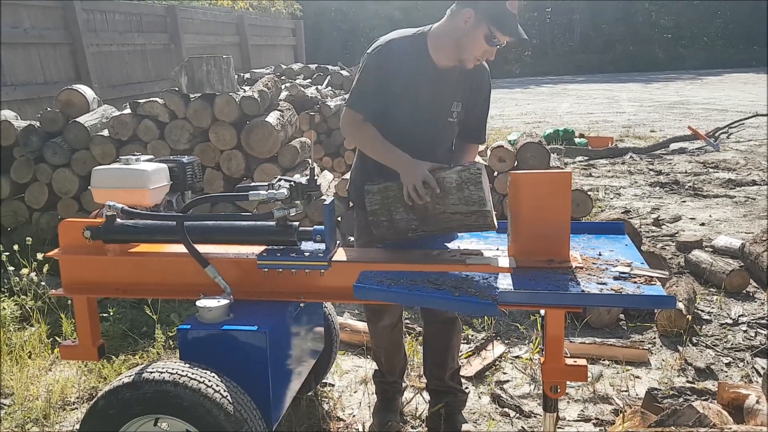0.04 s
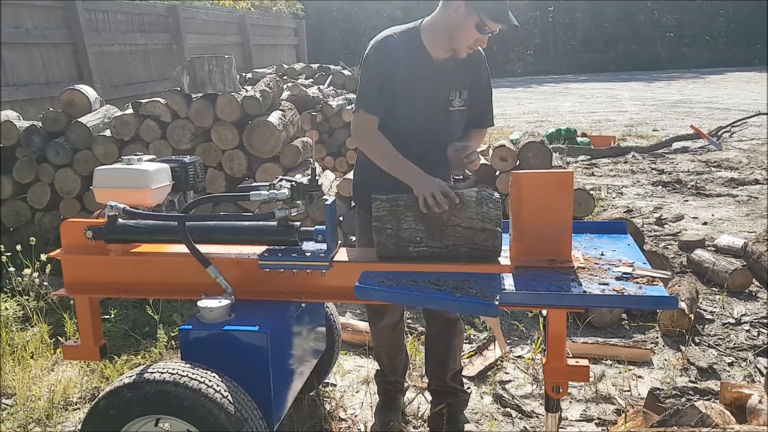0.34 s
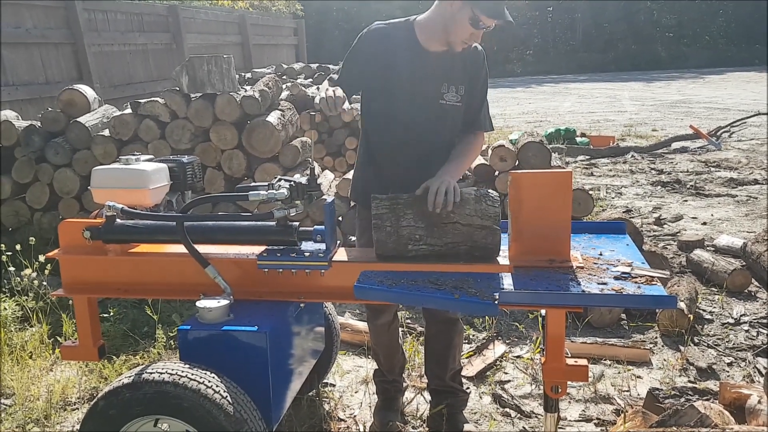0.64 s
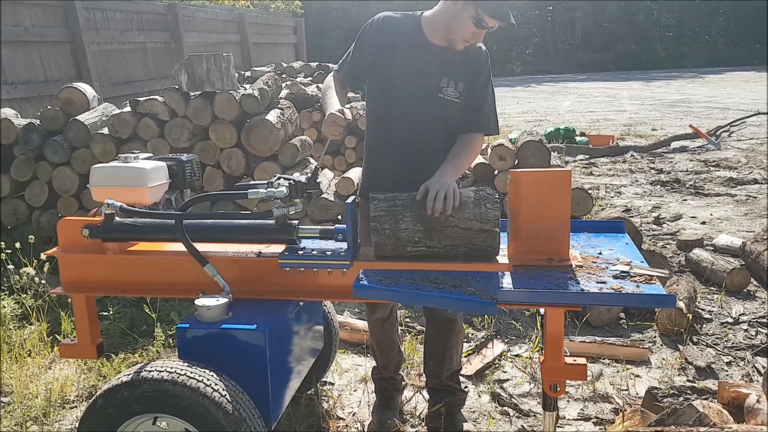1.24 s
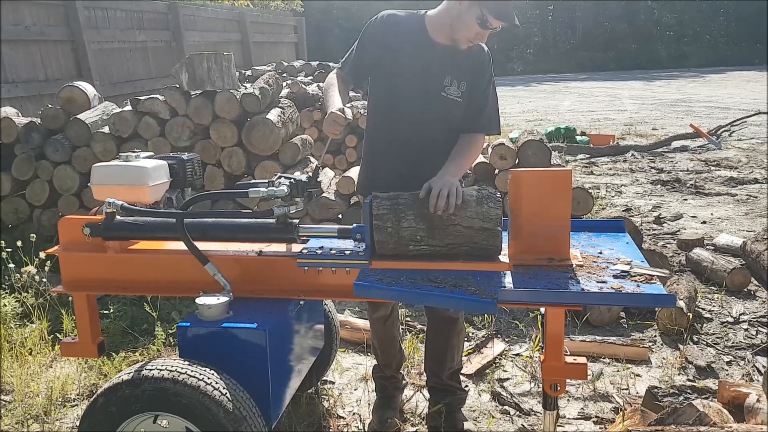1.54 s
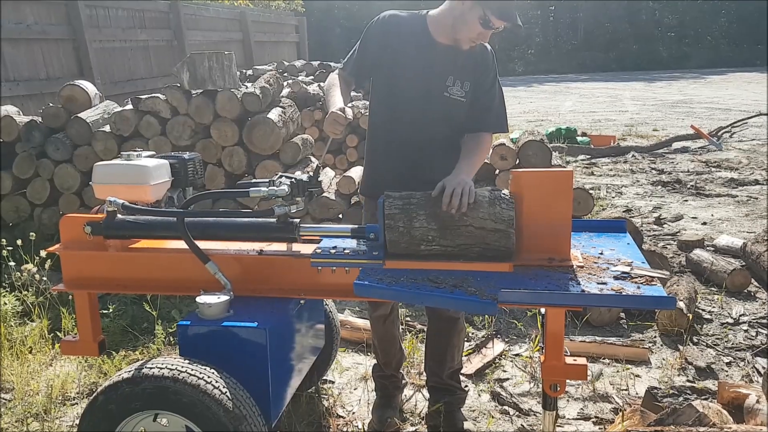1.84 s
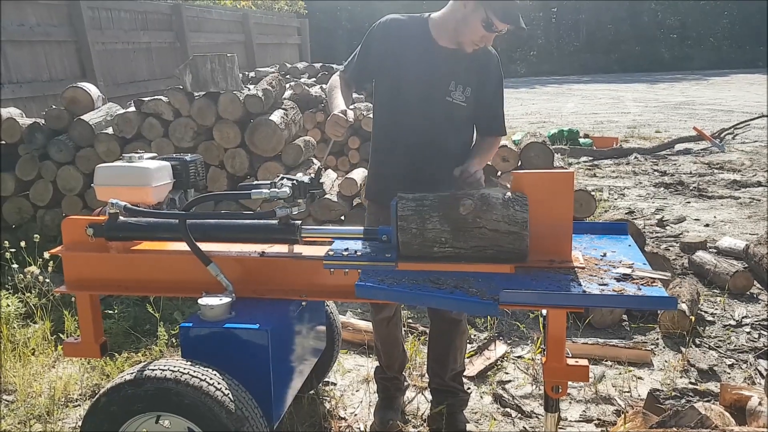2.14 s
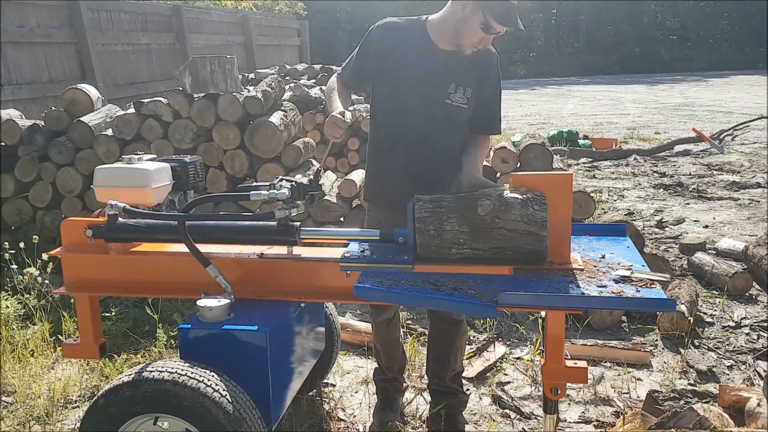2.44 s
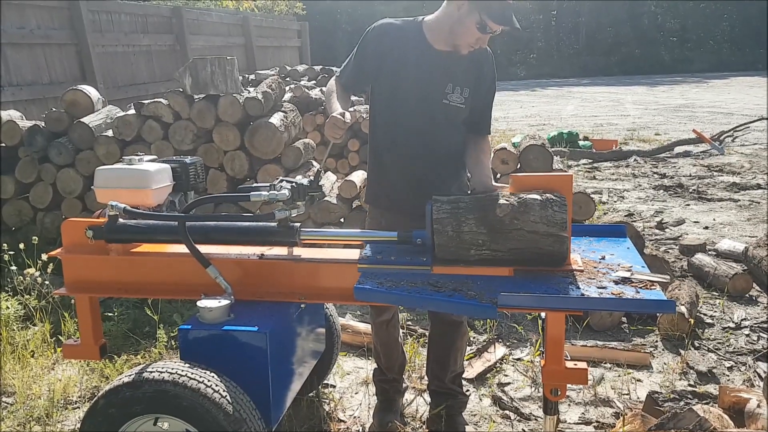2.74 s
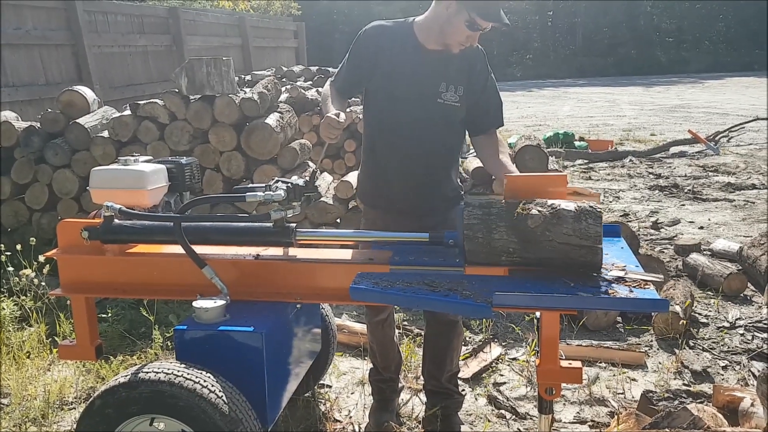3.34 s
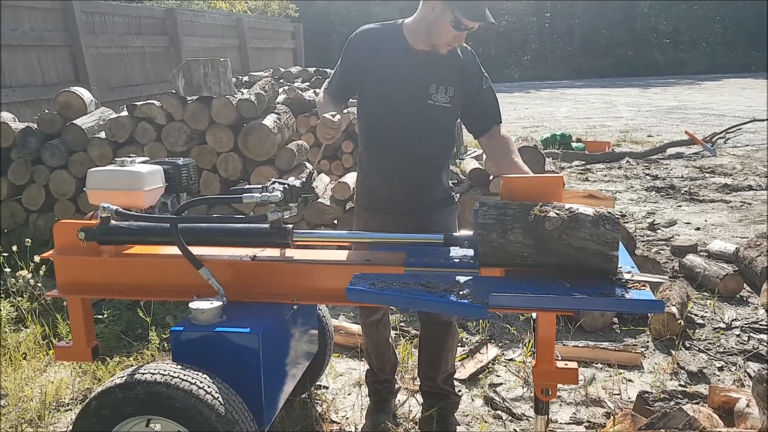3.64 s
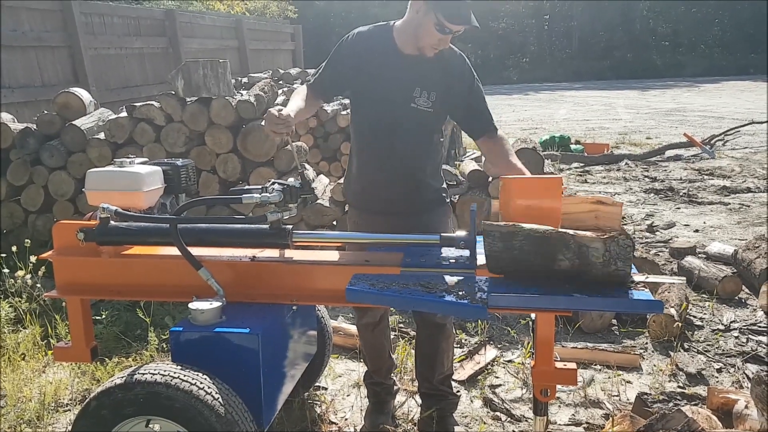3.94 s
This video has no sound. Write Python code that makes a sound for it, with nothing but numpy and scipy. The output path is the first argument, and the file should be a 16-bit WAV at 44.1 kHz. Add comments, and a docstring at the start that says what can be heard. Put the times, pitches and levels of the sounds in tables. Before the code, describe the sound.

Log splitter engine running steadily while wood scrapes, groans and cracks apart against the wedge.

```python
"""A single-cylinder petrol engine drones outdoors, driving a hydraulic log splitter.
The log scrapes and bumps on the steel beam, with one crack at 1 s. Near 2 s the ram presses it onto
the wedge: the engine sags, the wood groans, fibres tear and the log cracks open.
After the loudest crack the whole sound sinks for over half a second, then returns as the log
slides on with a few small cracks."""
import sys
import numpy as np
from scipy import signal
from scipy.fft import rfft, irfft
from scipy.io import wavfile

SR = 44100
rng = np.random.default_rng(int(sys.argv[2]) if len(sys.argv) > 2 else 0)


def unload_wav(signal):
    """Save mono or channel-first audio to the path in sys.argv[1] as 16-bit WAV at rate SR, clipped to [-1, 1]."""
    wavfile.write(
        sys.argv[1],
        SR,
        np.round(np.clip(np.atleast_2d(signal).T, -1, 1) * 32767).astype(np.int16),
    )


N = 176400
TIME = np.arange(N) / SR

# Engine speed. Each row: time in seconds, firings per second.
FIRING_HZ = [(0.0, 31.48), (0.08, 31.52), (0.23, 32.76), (0.45, 31.84), (0.62, 32.35), (0.8, 32.3),
             (1.2, 31.71), (1.47, 31.79), (1.6, 31.98), (1.86, 31.88), (2.1, 30.39), (2.3, 31.79),
             (2.48, 32.05), (2.75, 31.72), (3.2, 31.9), (3.7, 31.9), (4.0, 31.59)]


def amp(db):
    """Decibels to gain."""
    return 10 ** (np.asarray(db) / 20)


def unit(x):
    """Scale to rms 1."""
    return x / np.sqrt(np.mean(x ** 2) + 1e-20)


def curve(rows):
    """Time table interpolated at every sample."""
    return np.interp(TIME, *np.transpose(rows))


def at_hz(rows, hz):
    """Frequency table interpolated on a log axis."""
    row_hz, value = np.transpose(rows)
    return np.interp(np.log(hz + 1), np.log(row_hz + 1), value)


def add(mix, start_s, sound):
    """Mix a sound in at start_s."""
    part = mix[max(round(start_s * SR), 0):][:len(sound)]
    part += sound[:len(part)]


def drift(hz):
    """Random wander up to about hz, rms 1."""
    rolloff = 1 + (np.fft.rfftfreq(N, 1 / SR) / hz) ** 4
    return unit(irfft(rfft(rng.standard_normal(N)) / rolloff, N))


def through(x, response):
    """Convolve with a mono or stereo response."""
    return signal.fftconvolve(np.atleast_2d(x), np.atleast_2d(response), axes=1)[:, :N]


def colour(spectrum, size=4096):
    """Minimum-phase response with the given spectral shape, energy 1."""
    log_gain = np.log(amp(at_hz(spectrum, abs(np.fft.fftfreq(size, 1 / SR)))))
    response = np.fft.ifft(np.exp(np.conj(signal.hilbert(log_gain)))).real[:size // 2]
    return response / np.linalg.norm(response)


def ring(modes, size=8000):
    """Decaying sines of a struck body, energy 1."""
    t = np.arange(size) / SR
    response = sum(amp(db - 60 * t / t60_s) * np.sin(2 * np.pi * hz * t) for hz, db, t60_s in modes)
    return response / np.linalg.norm(response)


def stereo_noise(size):
    """White noise pair, alike in the bass."""
    # Each row: frequency in Hz, left-right correlation from 0 to 1.
    likeness = [(30, 0.7), (110, 0.6), (270, 0.82), (700, 1), (1200, 0.2), (2000, 0.26), (4000, 0.25),
                (16000, 0)]
    left, other = rfft(rng.standard_normal((2, size)))
    same = np.clip(at_hz(likeness, np.fft.rfftfreq(size, 1 / SR)), 0, 1)
    right = same * left + np.sqrt(1 - same ** 2) * other
    return irfft(np.array([left, right]), size)


def scatter(t60_s, size=8000):
    """Dense stereo reflections, energy 1 a side."""
    response = stereo_noise(size) * amp(-60 * np.arange(size) / SR / t60_s)
    return response / np.linalg.norm(response, axis=1, keepdims=True)


def rush(cycles):
    """Exhaust gas and cooling fan noise, throbbing with each engine cycle."""
    # Each row: frequency in Hz, relative density in dB.
    spectrum = [(15, -23), (30, -7.5), (50, -12), (110, -8), (210, -11), (320, -5), (460, -12), (700, -7.5),
                (900, -12.5), (1130, -4), (1400, -10), (1800, -10.5), (2400, -15.5), (2750, -17.5),
                (3300, -23), (5000, -26.5), (6300, -35), (8000, -33), (10100, -38), (12800, -32),
                (15800, -41)]
    # Each row: time in seconds, gain in dB.
    gain_db = [(0, 8.5), (.15, 5), (.9, 5), (1.03, 6), (1.15, 4.5), (1.9, 5), (2.6, 4), (3.5, 2), (4, 4)]
    air = unit(through(stereo_noise(N), colour(spectrum)))
    throb = 1 + 0.091 * np.cos(2 * np.pi * (cycles - 0.58)) + 0.15 * np.cos(4 * np.pi * (cycles - 0.43))
    flutter_db = 0.7 * drift(hz=24.6)
    return air * unit(throb) * amp(-19 + curve(gain_db) + flutter_db)


def engine_order(cycles, k, db, waver, phase_rad):
    """Harmonic k of the firing rate: swells near a panel resonance, thins near the boom under load."""
    # Panel resonances. Each row: centre in Hz, half-width in Hz, boost in dB.
    panels = [(293, 5, 6.5), (357, 4, 3.5), (1034, 6, 9.5), (615, 5, 5.5)]
    # Each row: time in seconds, engine load from 0 to 1.
    load = [(1.85, 0), (2.03, 0.3), (2.2, 1), (2.35, 0.5), (2.5, 0.07)]
    boom_hz, boom_width_hz, full_load_db = 124, 16, -16
    hz = k * curve(FIRING_HZ)
    panel_db = sum(boost / (1 + ((hz - centre) / width) ** 2) for centre, width, boost in panels)
    load_db = full_load_db * curve(load) / (1 + ((hz - boom_hz) / boom_width_hz) ** 2)
    angle = 2 * np.pi * k * cycles + phase_rad
    tone = (1 + waver * drift(hz=6)) * np.cos(angle) + waver * drift(hz=6) * np.sin(angle)
    return amp(db + panel_db + load_db) * tone


def whine(cycles):
    """High, restless orders of the gears and fan."""
    # Each row: multiple of the firing rate, relative level in dB.
    orders = [(19, -13), (21, -10), (23, -6), (24, -5), (27, -12), (31, -8), (32, -4), (33, -6), (34, -4),
              (35, -3), (36, -1), (37, -7), (38, -8), (40, -6), (41, -10), (48, -6), (54, -12), (55, -9),
              (62, -13), (85, -18)]
    return sum(engine_order(cycles, k, db - 25.5, waver=0.22, phase_rad=2 * np.pi * rng.random())
               for k, db in orders)


def exhaust(cycles):
    """Low orders crest once a firing, slightly smeared by the muffler; weak ones waver most."""
    # Each row: multiple of the firing rate, relative level in dB.
    orders = [(1, -59), (2, -0.5), (3, -8), (4, 2.5), (5, -10), (6, -6), (7, -24.5), (8, -1), (9, -13.5),
              (10, -10), (11, -9), (12, -13), (13, -24.5)]
    lead_rad, smear_rad = 0.25, 0.014
    return sum(engine_order(cycles, k, db - 18, waver=0.097 * amp(-db / 2),
                            phase_rad=lead_rad - smear_rad * k * k) for k, db in orders)


def clatter(cycles):
    """Piston and valves knock at set points of the cycle, ringing the casing and rattling the frame."""
    # Each row: position as a fraction of the cycle, relative level in dB.
    knock_points = [(.02, -2), (0.189, -5), (0.431, -9.5), (.59, 1), (.79, -10.5)]
    # Crankcase and covers. Each row: frequency in Hz, relative level in dB, T60 in seconds.
    casing_modes = [(614, -20, 0.084), (781, -24, 0.15), (1040, 6.5, 0.18), (1191, -35.5, 0.02),
                    (1323, -19.5, 0.12), (1487, 1, 0.24), (1755, -11, 0.21), (2160, -2, 0.12),
                    (2620, -22, 0.18)]
    # Each row: frequency in Hz, relative density in dB.
    rattle_spectrum = [(20, -52), (150, -20), (330, -8.5), (470, -15), (720, -12), (900, 1), (1120, -5),
                       (1400, -8), (1900, -4.5), (2400, -11.5), (2800, -8.5), (3500, -21.5), (6000, -29),
                       (16000, -34)]
    jitter_s, spread_db = 0.00005, 1.4
    knocks, cycle_index = np.zeros(N), np.arange(int(cycles[-1]) + 1)
    for fraction, db in knock_points:
        late, force = rng.standard_normal((len(cycle_index), 2)).T
        due_s = np.interp(cycle_index + fraction, cycles, TIME, left=-1, right=-1)
        at = np.round((due_s + jitter_s * late) * SR).astype(int)
        heard = (at >= 0) & (at < N)
        knocks[at[heard]] += amp(db + spread_db * force[heard])
    casing = through(knocks, ring(casing_modes))
    casing = unit(casing + 0.48 * through(casing, scatter(t60_s=0.1)))
    rattle = through(knocks, colour(rattle_spectrum))
    rattle = unit(through(rattle, scatter(t60_s=0.025)))
    return amp(-30) * casing + amp(-28) * rattle


def log_knocks():
    """Short damped knocks: the log bumps on the beam, and rings woodily at the loudest crack."""
    # Each row: start in seconds, level in dB, frequency in Hz, T60 in seconds.
    hits = [(.005, -8, 720, 0.07), (.33, -29, 94.1, 0.06), (1.025, -8, 325.4, 0.2), (2.224, 2.5, 675, 0.03),
            (3.975, -3.5, 794, .06), (3.977, -17, 174, 0.11)]
    out, t = np.zeros(N), np.arange(SR // 4) / SR
    for start_s, db, hz, t60_s in hits:
        add(out, start_s, amp(db - 60 * t / t60_s) * np.sin(2 * np.pi * hz * t))
    return out


def grains(spectrum, rate_hz=2000):
    """Dense tiny snaps of uneven size with short reflections, rms 1."""
    clicks = rng.standard_normal(N) * (rng.random(N) < rate_hz / SR)
    wood = through(clicks, colour(spectrum))
    return unit(wood + 0.63 * through(wood, scatter(t60_s=0.042)))


def scrapes():
    """Bark scrapes over the beam in grainy half-sine strokes."""
    # Each row: start in seconds, length in seconds, level in dB.
    strokes = [(-.03, 0.51, -20.5), (0.932, 0.14, -17.5), (3.163, .07, -23), (3.93, 0.11, -20.5)]
    # Each row: frequency in Hz, relative density in dB.
    spectrum = [(30, -37), (150, -11), (330, 4), (480, -23), (720, 15.5), (1100, -26), (1600, 4),
                (3000, -44), (6000, -37.5), (16000, -30)]
    envelope = sum(amp(db) * np.sin(np.pi * np.clip((TIME - start_s) / length_s, 0, 1))
                   for start_s, length_s, db in strokes)
    return grains(spectrum) * envelope


def groans():
    """Stick-slip of wood on the wedge: short rough glides."""
    # Each row: start in seconds, length in seconds, first and last pitch in Hz, level in dB.
    glides = [(1.999, 0.074, 271.4, 323, -15), (2.007, 0.097, 102, 80.5, -15.5),
              (2.02, 0.13, 198.8, 168, -12.5), (2.085, 0.113, 256.4, 326.5, -12.5),
              (2.117, 0.108, 134.4, 82.5, -21.5)]
    roughness, overtone_step_db = 0.048, -6.5
    out = np.zeros(N)
    for start_s, length_s, first_hz, last_hz, db in glides:
        progress = np.arange(0, length_s, 1 / SR) / length_s
        hz = first_hz + (last_hz - first_hz) * progress
        hz *= 1 + roughness * drift(hz=120)[:len(progress)]
        angle = 2 * np.pi * np.cumsum(hz) / SR
        tone = sum(amp(db + k * overtone_step_db) * np.sin((k + 1) * angle) for k in range(4))
        add(out, start_s, np.sin(np.pi * progress) * tone)
    return out


def tearing():
    """Fibres tear around the wedge; whole bundles crunch after the big breaks."""
    # Each row: time in seconds, level in dB.
    tear_db = [(1.9, -55), (2.03, -22), (2.08, -32), (2.15, -26.5), (2.19, -18), (2.22, -34), (2.31, -20),
               (2.38, -46), (2.5, -70)]
    # Each row: start in seconds, level in dB, decay constant in seconds.
    crunches = [(2.0698, -12.5, 0.041), (2.124, -26, 0.0067), (2.178, -21, .012), (3.189, -14, 0.0047)]
    # Each row: frequency in Hz, relative density in dB.
    spectrum = [(20, -49), (120, -20), (400, -9), (750, -3), (1300, -1.5), (2000, 4.5), (2800, -7.5),
                (4000, -13), (8000, -24), (16000, -27)]
    envelope = amp(curve(tear_db)) * (TIME > tear_db[0][0])
    for start_s, db, decay_s in crunches:
        add(envelope, start_s, amp(db) * np.exp(-TIME[:SR // 5] / decay_s))
    return grains(spectrum) * envelope


def cracks():
    """Each crack is one break and a quick run of smaller ones; they snap and ring the log."""
    # Each row: start in seconds, relative snap and ring levels in dB, run decay constant in seconds.
    breaks = [(0.057, -10, -28, 0.006), (1.018, -10, -14, 0.015), (1.993, -6, -16, 0.0038),
              (2.017, -8, -14, 0.004), (2.063, -18, -14, .006), (2.073, -9, 4, 0.0032),
              (2.122, -7.5, -23, 0.0033), (2.1253, -2.5, -11, 0.0026), (2.159, -15, -13, 0.0017),
              (2.184, -22, -3, .008), (2.189, -13, -16, 0.0031), (2.2204, -4.5, -5, 0.0029),
              (2.223, -3, 5, 0.0017), (2.259, -16, -1.5, .002), (2.292, -11, -18, 0.0035),
              (2.314, -15, -8, .006), (2.788, -7, -16, .003), (3.186, -8, -13, 0.0088),
              (3.211, -16, -8, 0.0038), (3.509, -13, -31, .002), (3.699, -12, -31, 0.0035),
              (3.716, -16, -33, .003), (3.762, -11, -21, 0.0017)]
    # Snapping fibre. Each row: frequency in Hz, relative density in dB.
    snap_spectrum = [(150, -57), (600, 19), (2800, -2), (4000, -2.5), (7000, -2.5), (10000, -11),
                     (13000, -4.5), (16000, -40)]
    # Each row: frequency in Hz, relative level in dB, T60 in seconds.
    log_modes = [(690, -8, .035), (1040, -11, .025), (1450, -11, .02), (2700, 0, .018), (2900, -5, .013),
                 (3650, -16, .012)]
    run_rate_hz, snap_gain_db, ring_gain_db, reflection_db = 4000, 14.5, 10.5, -8
    snaps, blows = np.zeros(N), np.zeros(N)
    t = np.arange(SR // 20) / SR
    for start_s, snap_db, ring_db, decay_s in breaks:
        sizes = 0.25 * rng.standard_normal(len(t)) * np.exp(-t / decay_s)
        run = sizes * (rng.random(len(t)) < run_rate_hz / SR)
        run[0] = 1  # the first break
        run /= np.linalg.norm(run)
        add(snaps, start_s, amp(snap_db + snap_gain_db) * run)
        add(blows, start_s, amp(ring_db + ring_gain_db) * run)
    direct = through(snaps, colour(snap_spectrum)) + through(blows, ring(log_modes))
    return direct + amp(reflection_db) * through(direct, scatter(t60_s=0.06))


def scene():
    """Engine slightly left, log in the middle."""
    left_lead_s = 0.00013
    cycles = np.cumsum(curve(FIRING_HZ)) / SR - 0.1
    left, right = exhaust(cycles) + whine(cycles) + clatter(cycles) + rush(cycles)
    engine = np.array([np.roll(left, -round(left_lead_s * SR)), right])
    return engine + cracks() + log_knocks() + groans() + tearing() + scrapes()


def record(dry):
    """Microphone bass roll-off, level dip, channel balance, clipping at full scale, band limit."""
    # Overall level, sinking after the loudest crack. Each row: time in seconds, gain in dB.
    dip_db = [(2.17, -3.5), (2.24, -5.5), (2.36, -12), (2.55, -14), (2.79, -13.5), (2.9, -9.5), (3.0, -4.5),
              (3.12, -3), (3.3, -2.5)]
    low_hz, high_hz, left_db, right_db = 21.7, 15900, -0.8, 0.55
    mic = signal.lfilter(*signal.butter(1, low_hz, "high", fs=SR), dry)
    clipped = np.clip(mic * amp(curve(dip_db)) * amp([[left_db], [right_db]]), -1, 1)
    lowpass = signal.firwin(511, high_hz, window=("kaiser", 9), fs=SR)
    return signal.oaconvolve(clipped, lowpass[None], "same")


dry = scene()
out = record(dry)
unload_wav(out)
```